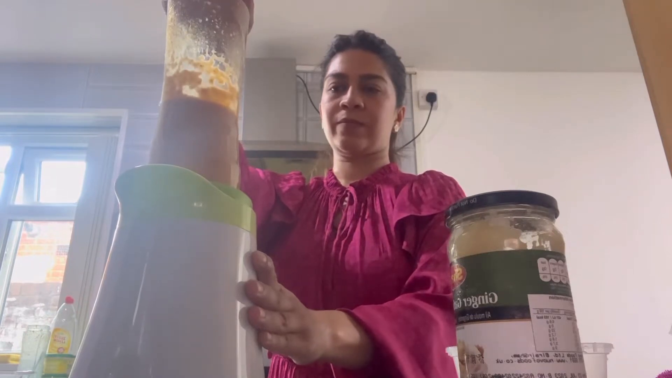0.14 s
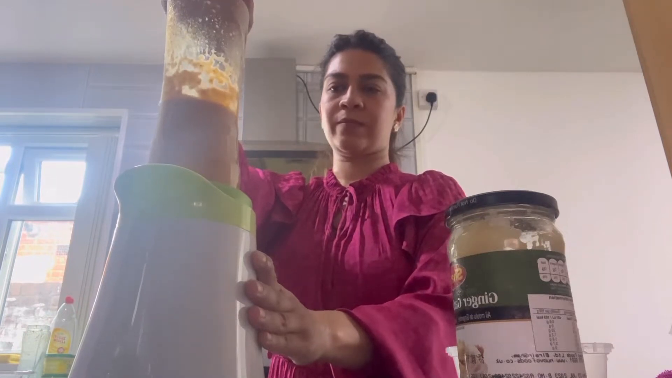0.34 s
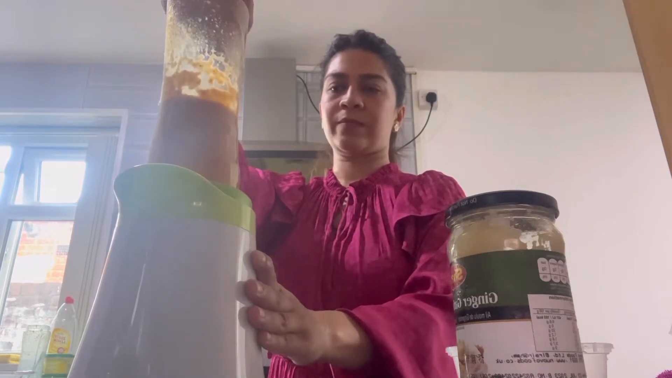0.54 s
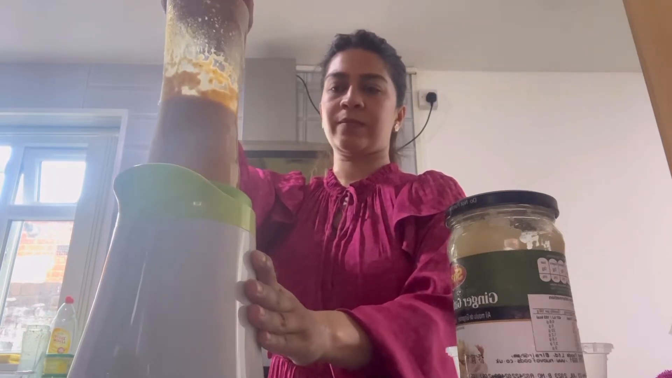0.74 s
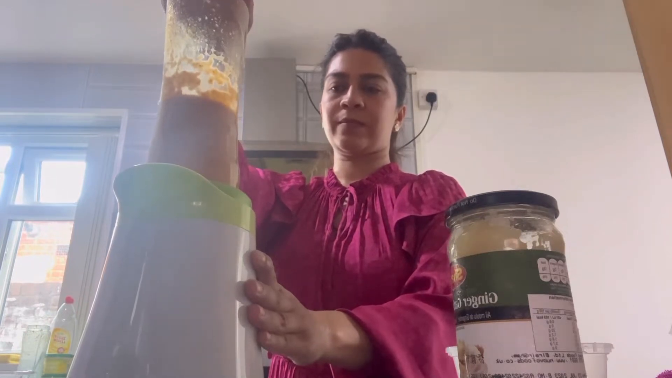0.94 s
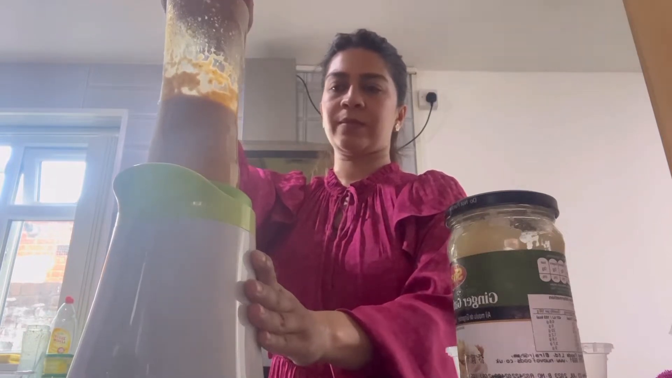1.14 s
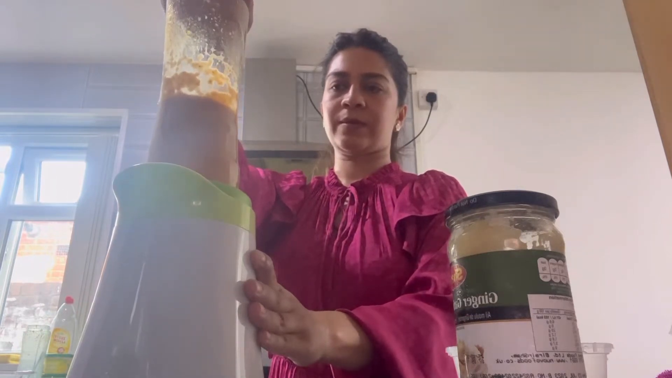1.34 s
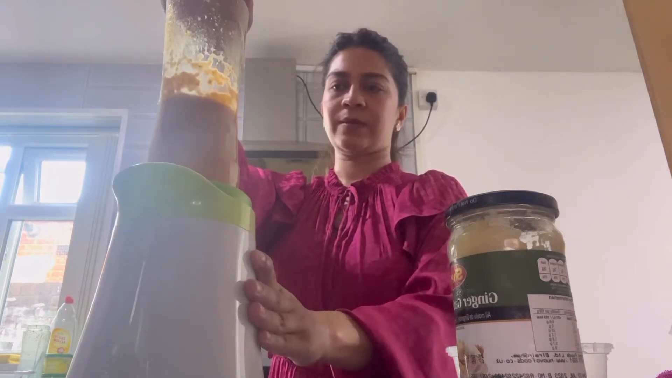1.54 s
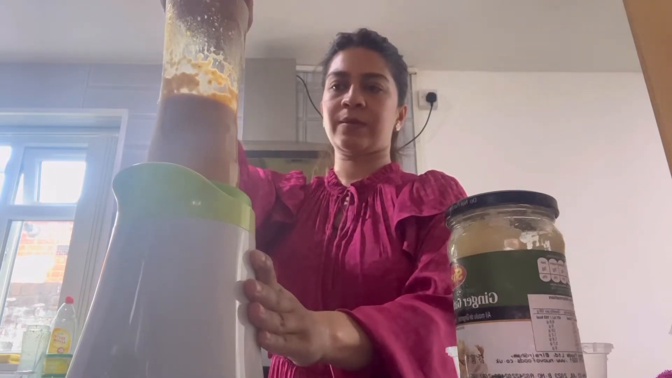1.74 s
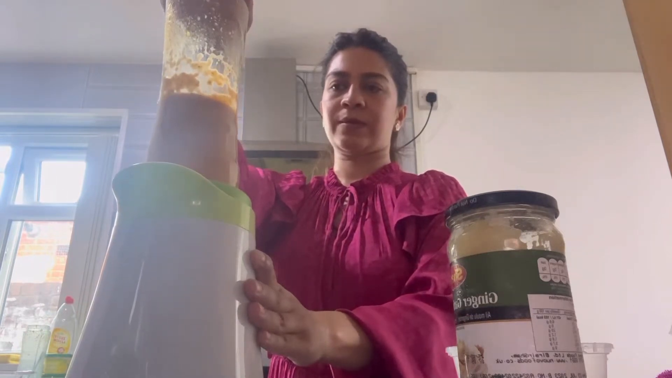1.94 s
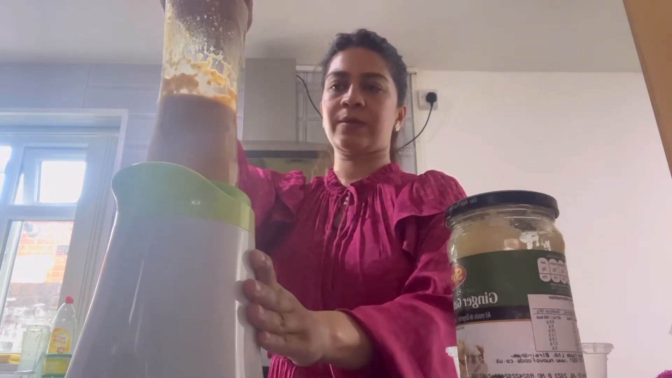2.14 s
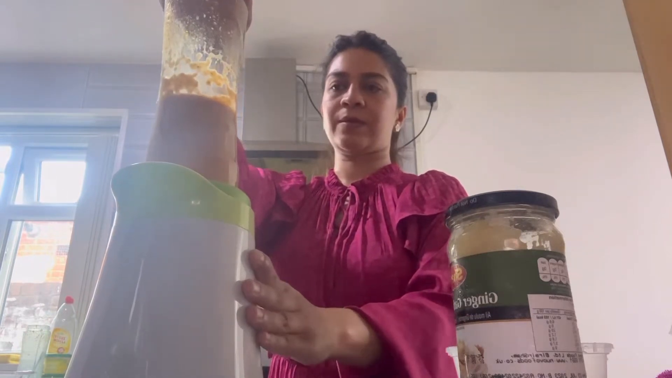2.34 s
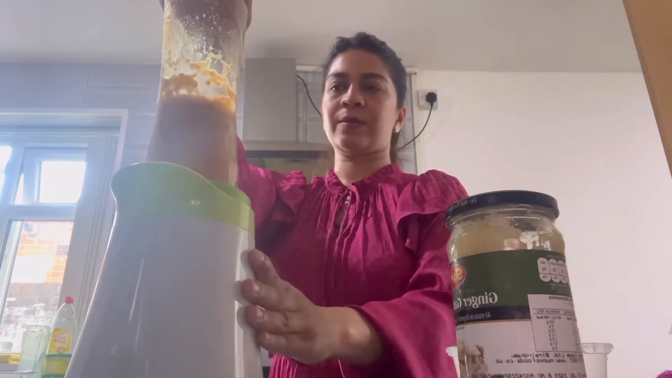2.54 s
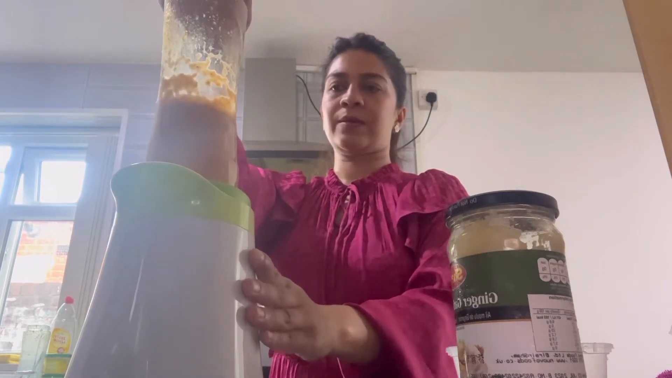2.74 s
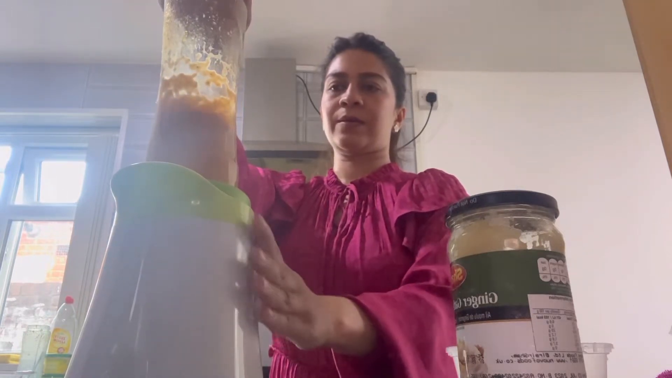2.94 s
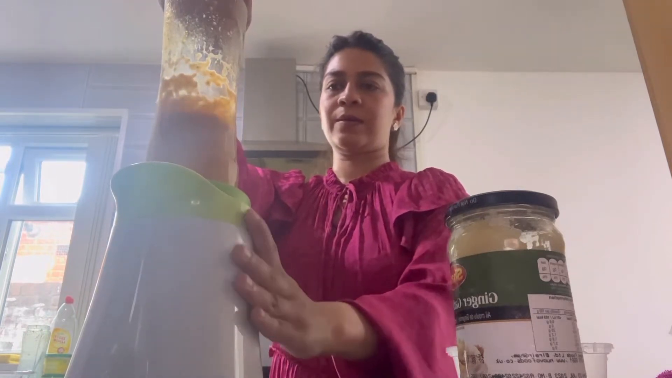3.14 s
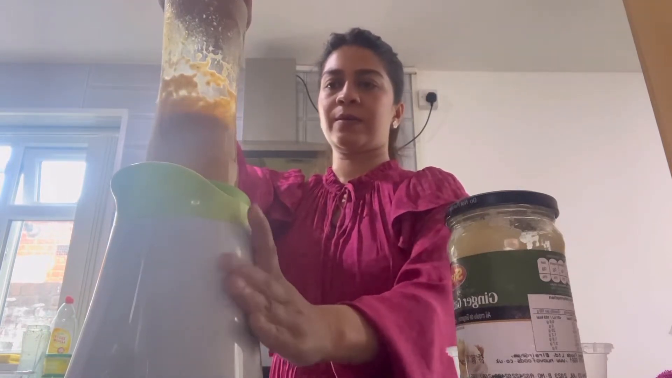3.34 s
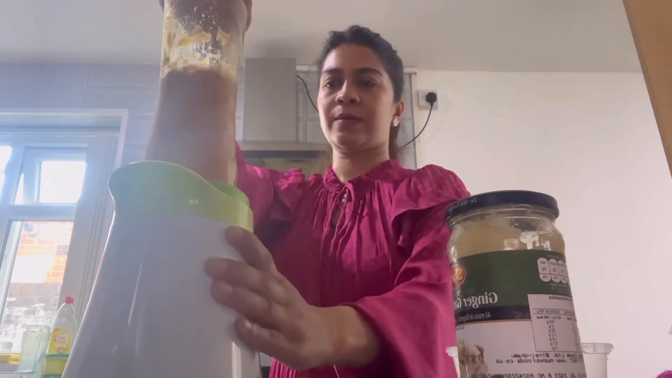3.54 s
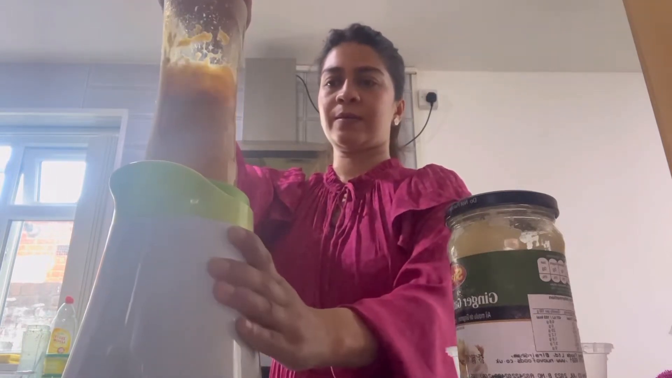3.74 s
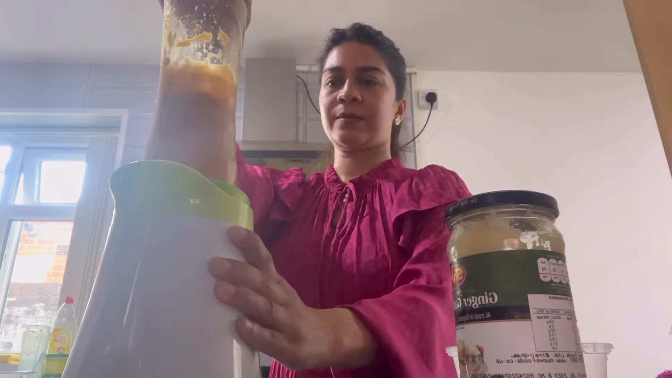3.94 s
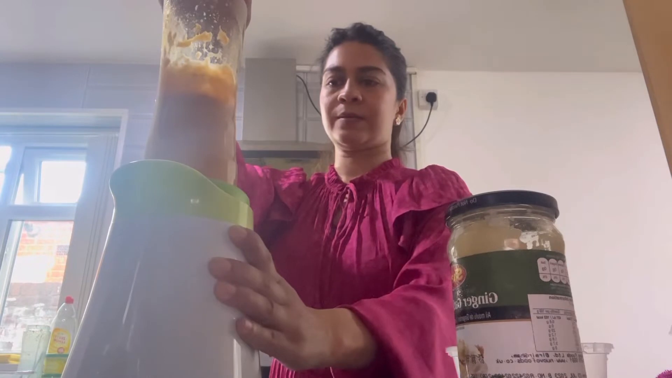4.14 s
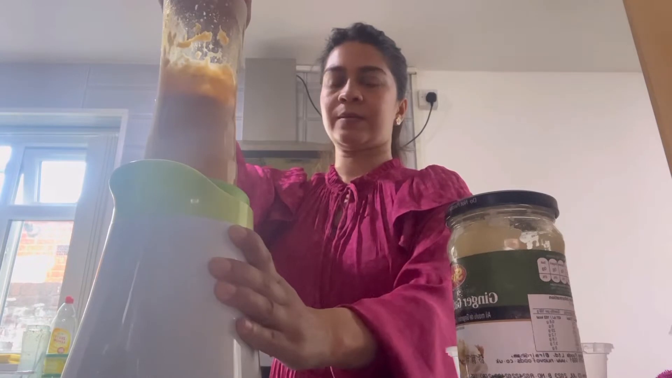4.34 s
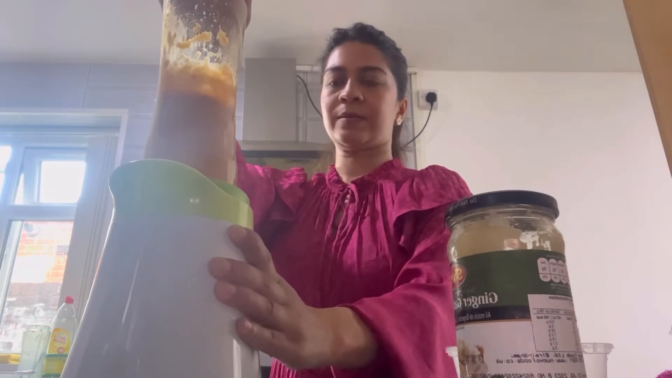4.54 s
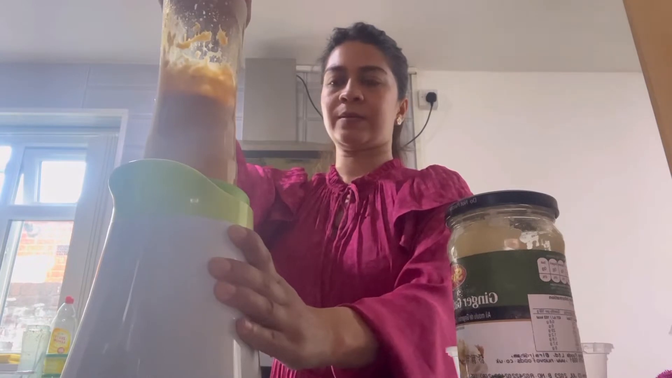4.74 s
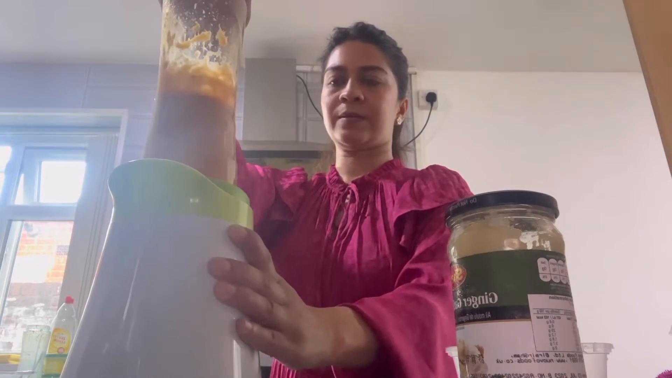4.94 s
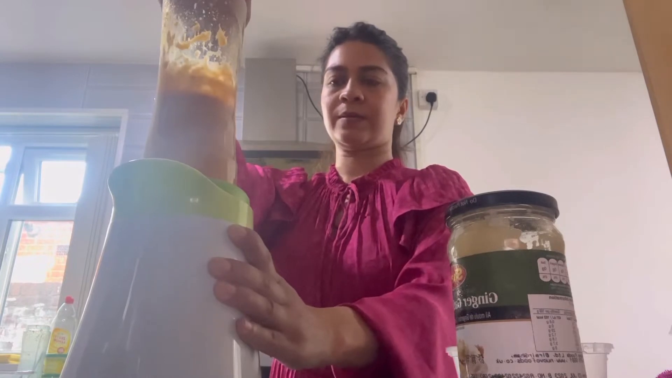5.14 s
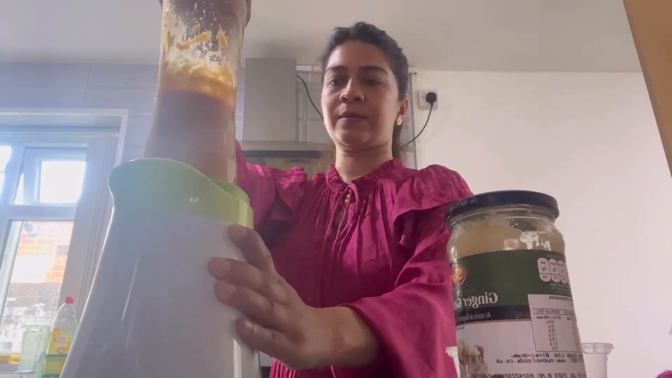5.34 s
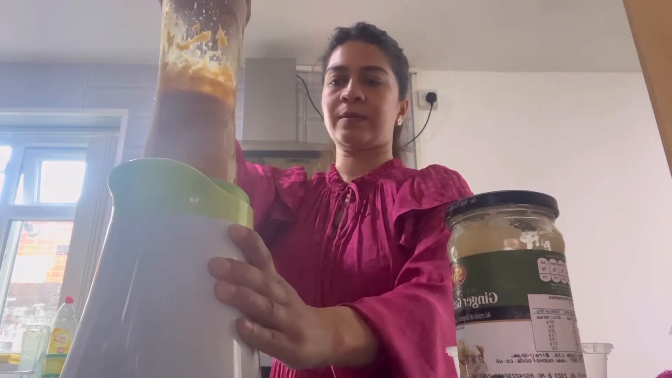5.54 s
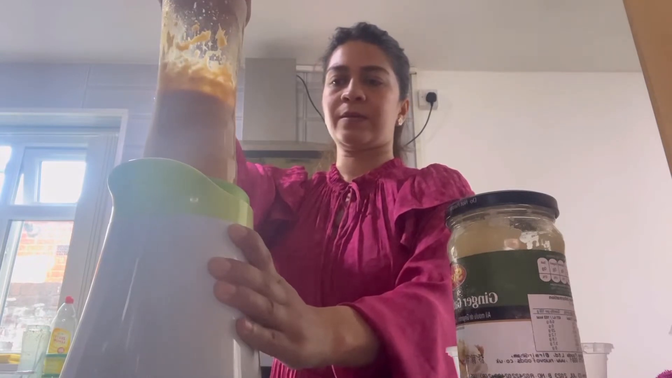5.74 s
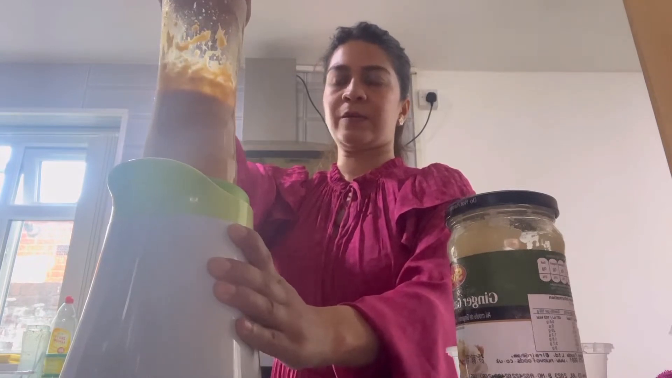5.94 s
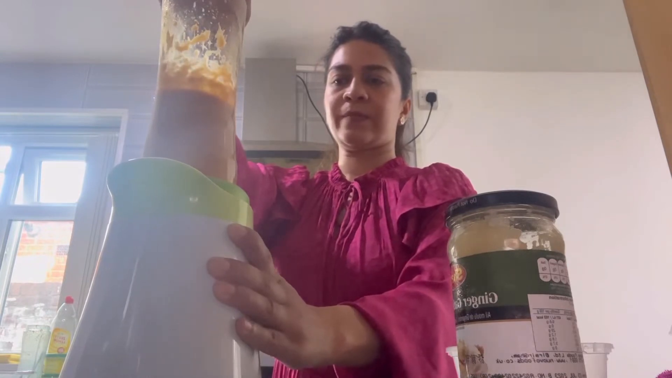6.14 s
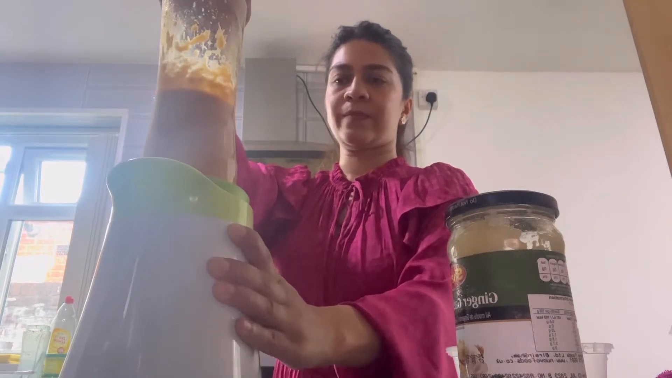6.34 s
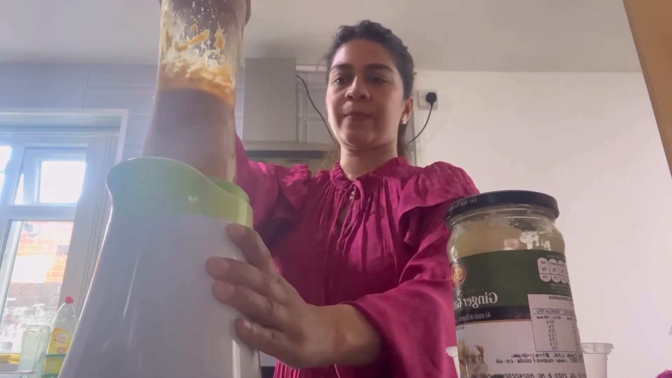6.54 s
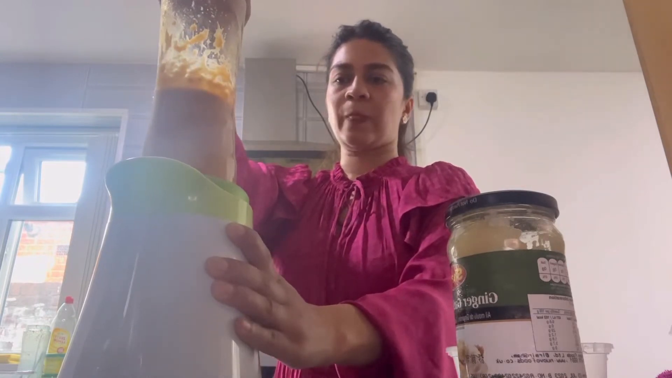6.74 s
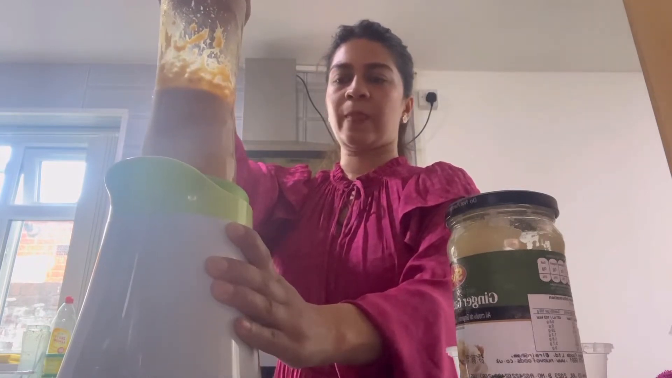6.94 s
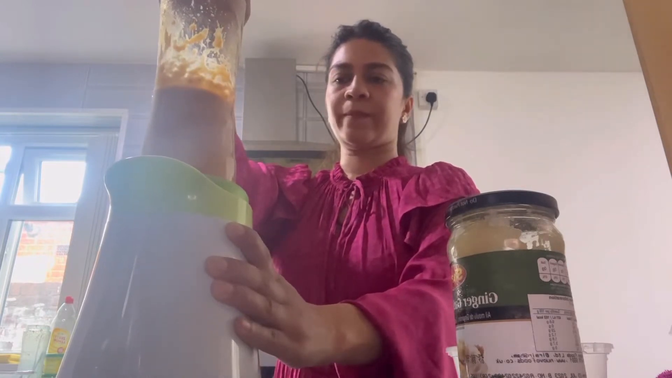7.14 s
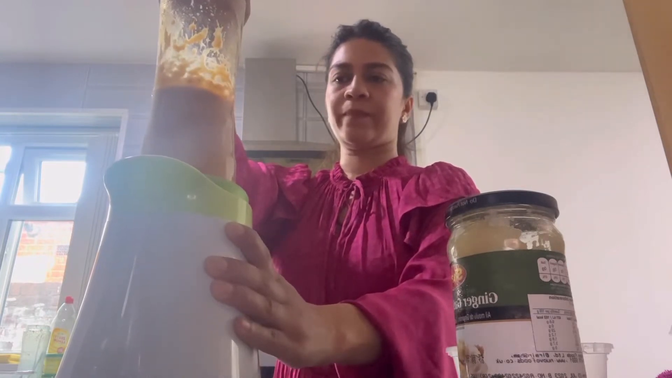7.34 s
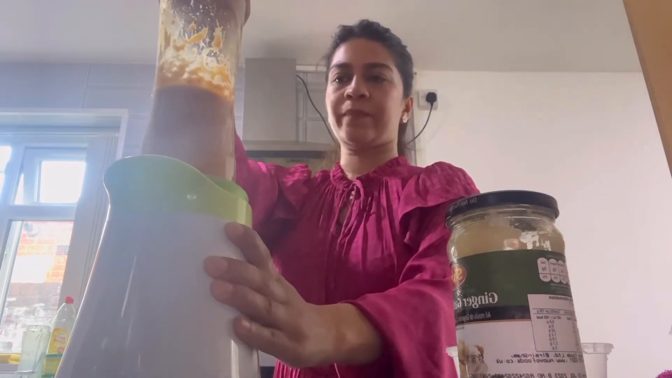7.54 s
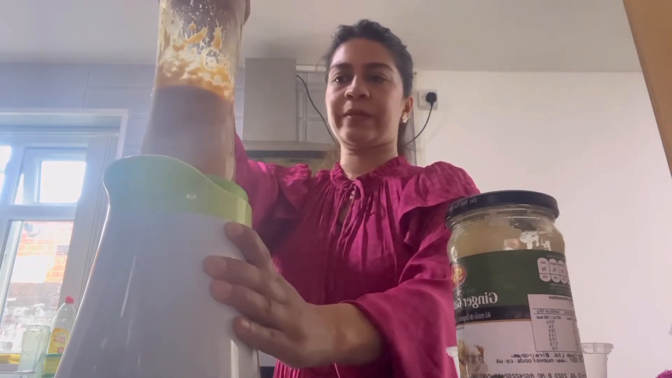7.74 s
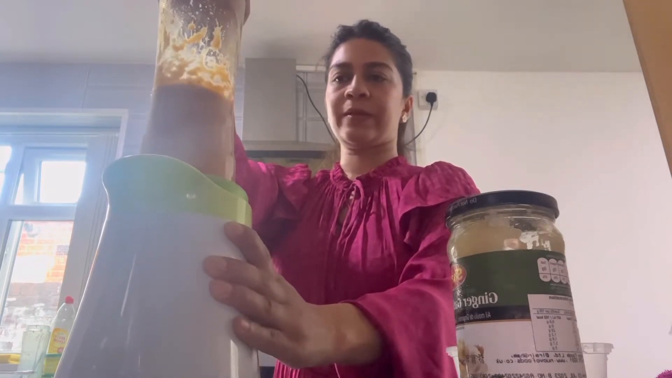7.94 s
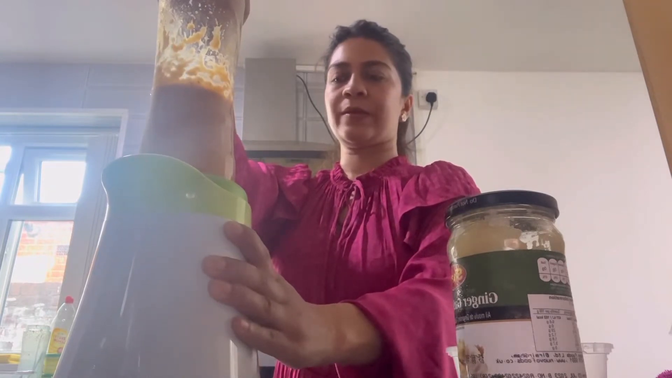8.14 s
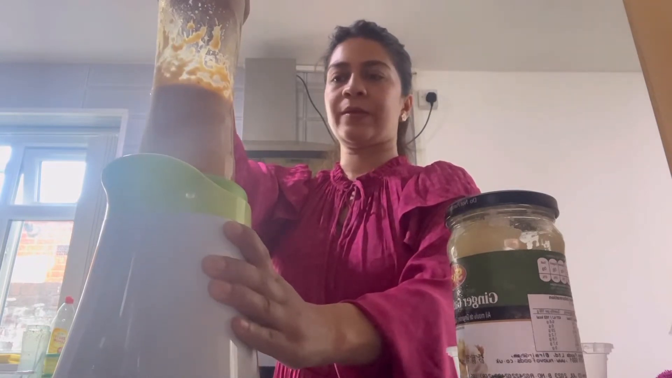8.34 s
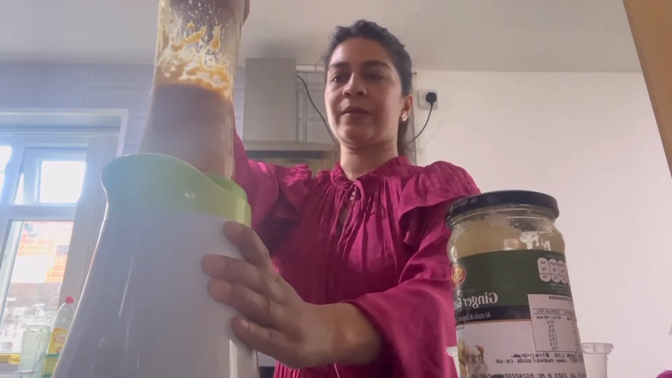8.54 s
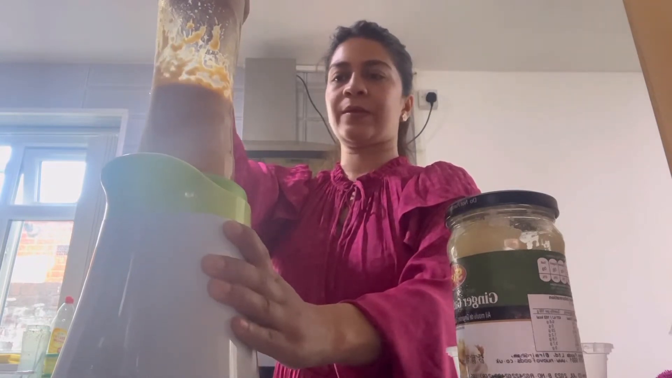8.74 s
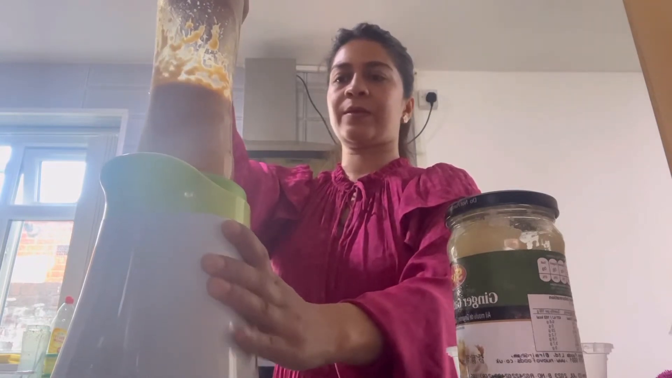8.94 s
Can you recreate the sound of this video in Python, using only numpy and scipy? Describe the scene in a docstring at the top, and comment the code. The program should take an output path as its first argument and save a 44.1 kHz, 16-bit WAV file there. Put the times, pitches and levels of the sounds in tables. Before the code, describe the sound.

Close stereo pickup in a small, quiet kitchen: blades churn and shred dense paste, the plastic jug ringing over a fluttering motor drone. Power is released and the noise sinks quickly in pitch and level, chattering to rest. A hand softly brushes the hollow housing. Then the base clicks and knocks on the counter, the motor surges up within a fraction of a second, and grinding continues almost to the end.

```python
"""A jug blender grinds a thick paste close by in a kitchen, is let go and coasts to a stop, then restarts.
Blades churn and shred the paste as dense grains of noise, which set the plastic jug and housing ringing.
The shaft hums at its harmonics, fluttering with the mains; the coasting paste groans, the coupling rattles.
A hand rubs the housing in the pause, and the restart jolts it on the counter.
Two microphone ports hear it with the room, over a quiet kitchen."""
import sys
import numpy as np
from scipy import signal
from scipy.fft import rfft, irfft, next_fast_len
from scipy.io import wavfile
from scipy.ndimage import uniform_filter1d

SR = 44100
rng = np.random.default_rng(int(sys.argv[2]) if len(sys.argv) > 2 else 0)


def to_wav(s):
    """Save 16-bit WAV."""
    ch = np.atleast_2d(s).T  # columns
    pcm = np.round(np.clip(ch, -1, 1) * 32767)  # PCM
    wavfile.write(sys.argv[1], SR, pcm.astype(np.int16))


N = 396459
TIME = np.arange(N) / SR   # s
SIZE = next_fast_len(N + SR)   # transform length, padded against wrap-around
BINS = np.maximum(np.arange(SIZE // 2 + 1) * SR / SIZE, 1)   # Hz
MAINS_HZ = 50
FULL_SPEED_HZ = 275   # nominal shaft speed; pace is speed as a share of this


def from_db(db):
    """Decibels to gain."""
    return np.exp(np.asarray(db) * (np.log(10) / 20))


def rms_one(x):
    """Scale to rms 1."""
    return x / np.sqrt(np.mean(x ** 2) + 1e-20)


def by_speed(pace, power):
    """Change in dB of a sound whose amplitude grows with a power of speed."""
    return 20 * power * np.log10(pace + 1e-9)


def pan(left_right_db):
    """Left and right gains that differ by so many dB."""
    return from_db(left_right_db * np.array([[.5], [-.5]]))


def at_hz(points):
    """A table read along log frequency."""
    hz, value = np.transpose(points)
    return np.interp(np.log(BINS), np.log(hz), value)


def filtered(x, response):
    """Apply a frequency response."""
    return irfft(rfft(x, SIZE) * response, SIZE)[..., :N]


def drift(rate):
    """Smooth random curve of spread 1 that changes about rate times a second."""
    step = 40   # samples between points
    r = np.exp(-2 * np.pi * rate * step / SR)
    noise = rng.standard_normal(2 * N // step)
    # the first part is dropped so that the curve starts settled
    slow = signal.lfilter([1], [1, -2 * r, r * r], noise)[-(N // step) - 1:]
    return np.interp(np.arange(N) / step, np.arange(len(slow)), rms_one(slow))


def grains(per_s, spread_db):
    """Tiny impacts of uneven size and random sign at random moments."""
    size = from_db(spread_db * np.minimum(rng.exponential(1, N), 4))
    struck = rng.random(N) < per_s / SR
    return rms_one(struck * size * rng.choice([-1, 1], N))


def rubbed(level_db, hz, waver_per_s, flicker_db=2.5, waver=.8):
    """One narrow resonance kept ringing by friction, unsteady in level (dB) and phase (radians)."""
    phase = 2 * np.pi * hz * TIME + waver * drift(waver_per_s)
    level = from_db(level_db + flicker_db * drift(waver_per_s))
    return np.sqrt(2) * level * np.sin(phase)


def ambience(level_db=-47.7, swell_db=.7, hum_db=-57, alike_hz=450):
    """Room noise that swells a little, alike on both sides in the bass, with a faint mains hum."""
    # colour of the quiet kitchen: f/Hz, relative level/dB per Hz
    room_tone = [(30, -44), (62, -12), (95, -9), (130, -12), (160, -8), (190, -13), (230, -2.5), (350, -15),
                 (470, -6.5), (691, -21), (790, -14), (1250, -27), (2400, -33), (3200, -42), (7500, -52),
                 (10500, -49), (14000, -55)]
    colour = from_db(at_hz(room_tone))
    mid = filtered(rng.standard_normal(N), colour)
    side = filtered(rng.standard_normal(N), colour * BINS / np.hypot(BINS, alike_hz))
    noise = (mid + side * np.array([[1], [-1]])) / np.std(mid)
    mains_hum = from_db(hum_db) * np.sin(4 * np.pi * MAINS_HZ * TIME)
    return from_db(level_db + swell_db * drift(4.8)) * noise + mains_hum


def ports():
    """Phase with which the sound reaches the left and right port."""
    # path to the two ports: f/Hz, lead of the left/rad
    port_phase = [(60, 0), (170, 0), (275, 1.5), (335, 2.4), (370, -.6), (520, 1.8), (570, 1.2), (600, -.9),
                  (660, -1.1), (760, 2.2), (820, 2.0), (835, 2.4), (940, 3.0), (1000, .3), (1080, .6),
                  (1380, 4.4), (1500, 3.0), (1790, 3.2), (1850, -.2), (1900, 0), (4500, 1.4), (7500, 2.9),
                  (11000, 1.2)]
    return np.exp(1j * at_hz(port_phase) * np.array([[.5], [-.5]]))


def kitchen(x, t60=0.32, early_t60=0.026, early_db=5, ripple_hz=90):
    """Direct sound at two ports, near reflections from counter and walls, then a short tail."""
    # room sound before the broad colour is evened out: f/Hz, level re the direct sound/dB
    room_share = [(60, -54), (200, 3), (900, -2.5), (2500, 2.5), (5500, 14), (8000, -6), (14000, -9)]
    t = TIME[:SR // 2]
    tail = from_db(-60 * t / t60)
    early = from_db(early_db - 60 * t / early_t60)
    envelope = (tail + early) * (t > .002)
    echoes = rng.standard_normal((2, len(t))) * envelope / np.sqrt(np.sum(envelope ** 2))
    response = ports() + from_db(at_hz(room_share)) * rfft(echoes, SIZE)
    # the room ripples the spectrum finely but adds no broad colour
    broad = uniform_filter1d(np.abs(response) ** 2, size=ripple_hz * SIZE // SR, axis=1)
    return filtered(x, response / np.sqrt(broad))


def hand():
    """A palm slides over the housing in short pushes; its tiny slips excite the hollow plastic."""
    # pushes of the palm: t/s, length/s, level/dB
    rubs = [(2.875, .02, -50), (2.955, .025, -49), (3.06, .018, -47), (3.115, .02, -50)]
    # hollow housing under the palm: f/Hz, width before squaring/Hz, level/dB
    hollow = [(385, 70, -5), (472, 80, 0), (760, 60, -9)]
    push = sum(from_db(level_db) * np.exp(-((TIME - s) / length_s) ** 2) for s, length_s, level_db in rubs)
    response = 0
    for hz, width_hz, level_db in hollow:
        response = response + from_db(level_db) / (1 + 2j * (BINS - hz) / width_hz) ** 2
    return push * rms_one(filtered(grains(900, spread_db=2.5), response))


def jolts(crack_db=-2, crack_t60=.012):
    """The switch clicks, the coupling takes up the load and the housing kicks against the counter."""
    # blows of switching on: t/s, level/dB, contact softness f/Hz (low is soft)
    blows = [(3.352, -37, 12000), (3.378, -26, 1200), (3.396, -26, 500), (3.425, -16, 450),
             (3.438, -16, 180), (3.46, -11, 55)]
    # modes of the housing on the counter: f/Hz, level/dB, t60/s
    modes = [(54, -7, .13), (72, -0.5, 0.12), (111, -8, 0.1), (165, -1, .12), (225, -8, .08),
             (445, 4, 0.075), (560, -5, .07), (660, 0, 0.11), (910, -5, .08), (2500, -16, .03),
             (5600, 1, .012), (10000, -9, .005)]
    out = np.zeros(N)
    t = TIME[:SR // 2]
    for s, level_db, soft_hz in blows:
        # the harder the contact, the louder its crack
        crack = from_db(crack_db - 60 * t / crack_t60) * rng.standard_normal(len(t))
        blow = crack * 2 * soft_hz / SR
        for hz, mode_db, t60 in modes:
            # a contact feeds the modes near its own speed
            strength = from_db(mode_db) / np.hypot(1, hz / soft_hz) * (hz / np.hypot(hz, soft_hz / 2)) ** 2
            ring = from_db(-60 * t / t60) * np.sin(2 * np.pi * hz * t)
            blow = blow + rng.choice([-1, 1]) * strength * ring
        # a soft contact builds slowly
        onset = 1 - np.exp(-2 * soft_hz * t)
        start = int(s * SR)
        out[start:start + len(t)] += from_db(level_db) * blow * onset
    return out


def motor(speed_jitter=.0007):
    """Drive lifts the shaft to its loaded speed; drag stops it. Gives speed Hz, drive 0-1, strain 0-1."""
    # runs under power: switched on t/s, let go t/s
    runs = [(-1.0, 2.2), (3.349, 8.925)]
    # speed that the paste allows the shaft under power: t/s, f/Hz
    loaded_speed = [(0.0, 271), (.28, 272.6), (.46, 270.9), (.85, 272.4), (1.0, 268.4), (1.26, 274.5),
                    (1.54, 273.4), (1.64, 271.5), (1.94, 271.9), (2.08, 275.4), (3.6, 269), (3.76, 272),
                    (3.88, 265), (3.97, 272.6), (4.22, 270.2), (4.5, 273.2), (4.62, 272.5), (4.82, 276),
                    (5.05, 273.7), (5.18, 274.2), (5.32, 271.9), (5.42, 273.8), (5.62, 274), (5.78, 280.3),
                    (6.1, 276.4), (6.28, 275.9), (6.38, 273.1), (6.52, 275.4), (6.86, 274.3), (7.04, 278.8),
                    (7.16, 278.4), (7.3, 274), (7.48, 277), (7.72, 275.8), (7.85, 274.2), (8.0, 277.2),
                    (8.24, 277), (8.46, 280.3), (8.6, 276.2), (8.74, 277.3), (8.92, 275.6)]
    run_up_s, torque_s = .092, .03   # time constants of gathering speed and of the drive
    coast_s, drag_s = .68, .87   # time to come to rest; time constant of the paste's drag
    strain_hz, strain_width_hz = 271.9, 1.4   # strain grows as the paste pulls the speed under this
    loaded_hz = np.interp(TIME, *np.transpose(loaded_speed))
    share, drive = 0, 0
    rest = np.exp(-coast_s / drag_s)
    for on_s, off_s in runs:
        since_on, since_off = np.maximum(TIME - on_s, 0), np.maximum(TIME - off_s, 0)
        coasting = np.maximum(np.exp(-since_off / drag_s) - rest, 0) / (1 - rest)
        share = share + (1 - np.exp(-since_on / run_up_s)) * coasting
        drive = drive + (1 - np.exp(-since_on / torque_s)) * np.exp(-since_off / torque_s)
    strain = .5 + .5 * np.tanh((strain_hz - loaded_hz) / strain_width_hz)
    speed_hz = share * loaded_hz * (1 + speed_jitter * drift(11.68))
    return speed_hz, drive, strain


def base(pace, strain, rumble_db=-48, buzz_db=-49.3, buzz_waver=0.18, strain_db=2.5):
    """The base shakes the counter, and the iron buzzes at twice the mains rate; both grow under strain."""
    # colour of the base shaking on the counter: f/Hz, relative level/dB per Hz
    shake_colour = [(35, -54), (50, -13), (70, 7), (88, -15), (130, 4.5), (185, -15), (240, -1), (400, -15),
                    (1000, -50)]
    rumble = rms_one(filtered(rng.standard_normal(N), from_db(at_hz(shake_colour))))
    rumble = from_db(rumble_db) * rumble * (pace + 1e-9) ** 0.27
    buzz = np.sqrt(2) * np.sin(4 * np.pi * MAINS_HZ * TIME) * (1 + buzz_waver * drift(2.7))
    buzz = from_db(buzz_db) * buzz * pace ** 2
    return from_db(strain_db * strain) * (rumble + buzz)


def rattle(pace, drive, level_db=-41.5, ends_at_pace=.14, soft_hz=4000):
    """With the power off the slack coupling chatters, until the shaft is almost still."""
    # ringing of the slack coupling: f/Hz, width/Hz, level/dB
    rings = [(1880, 90, -2), (2400, 80, -3), (3120, 70, -4.5)]
    response = 0
    for hz, width_hz, ring_db in rings:
        response = response + from_db(ring_db) / (1 + 2j * (BINS - hz) / width_hz)
    # little bass below the first ring; a soft contact dulls the top
    response = response * BINS ** 2 / (BINS ** 2 + rings[0][0] ** 2) / (1 + (BINS / soft_hz) ** 4)
    loose = (1 - drive) * (.5 + .5 * np.tanh((pace - ends_at_pace) / .07))
    chatter = rms_one(filtered(grains(500, spread_db=2.0), response))
    return from_db(level_db + by_speed(pace, .8)) * loose * chatter


def housing_drone(pace, level_db=-45.5):
    """The housing drones near full speed, mostly on the left."""
    return pan(15) * rubbed(level_db + by_speed(pace, 5), hz=342, waver_per_s=9)


def paste_groan(pace, drive, level_db=-36.5):
    """The paste groans while the blades coast."""
    return (1 - drive) * rubbed(level_db + by_speed(pace, .75), hz=408, waver_per_s=16)


def jug_singing(pace, strain, level_db=-39, strain_db=10):
    """The jug sings when the paste presses on its wall, louder under strain."""
    return rubbed(level_db + strain_db * strain + by_speed(pace, 2), hz=742, waver_per_s=5)


def hum(angle, speed_hz, drive, gain_db=1.0, flicker_db=1.6, wobble=0.1, mains_depth=0.15):
    """Shaft harmonics slide through peaks, shaken by the paste; torque pulses twice per mains cycle."""
    # tones at full speed: shaft multiple, sideband number (of twice the mains),
    # level before peaks and gain/dB, left-right/dB
    harmonics = [(1, 0, -44.6, 2), (1, 1, -51.5, 5), (2, 0, -44, 5), (3, 0, -38, 2), (4, 0, -43.5, -1.5),
                 (4, -1, -49.5, 19), (5, 0, -48.5, -3), (5, 1, -51, -10), (6, 0, -45.5, -3),
                 (7, 0, -51, -2), (8, 0, -58, -12), (9, 0, -49.5, -2), (10, 0, -58, 0), (11, 0, -52.5, 1),
                 (12, 0, -59, -2), (15, 0, -54.5, 15.5)]
    # peaks and dips between motor and ports: f/Hz, width/Hz, lift/dB
    tone_peaks = [(276, 26, 9), (370, 90, 7), (820, 60, 11.5), (828, 5, -10), (1090, 76, 10.6),
                  (1101, 5, -3), (1376, 34, 11), (1645, 80, 10), (1905, 42, 12.5)]
    whine_drop_db, whine_above_hz = 9, 550   # with the power off the whine sinks into the grinding
    blades, blade_start_db, run_up_done = 4, 6, .99   # blade note lift at standstill; pace where it ends
    mains = 4 * np.pi * MAINS_HZ * TIME
    peaks_db = sum(lift_db / (1 + (2 * (BINS - hz) / width_hz) ** 2) for hz, width_hz, lift_db in tone_peaks)
    pace = speed_hz / FULL_SPEED_HZ
    starting = drive * np.sqrt(np.maximum(1 - pace / run_up_done, 0))
    out = np.zeros((2, N))
    for k, sideband, level_db, pan_db in harmonics:
        line_hz = k * speed_hz + sideband * 2 * MAINS_HZ
        # higher harmonics are the more restless
        unrest = np.sqrt(k / 4)
        line_db = level_db + by_speed(pace, 1.4) + np.interp(line_hz, BINS, peaks_db)
        line_db = line_db + flicker_db * unrest * drift(11)
        line_db = line_db - whine_drop_db * (1 - drive) / (1 + (whine_above_hz / np.maximum(line_hz, 1)) ** 4)
        start_phase = rng.uniform(0, 2 * np.pi)
        line = np.sin(k * angle + sideband * mains + start_phase + wobble * unrest * drift(37))
        if sideband:
            line = line * drive
        elif k == blades:
            line_db = line_db + blade_start_db * starting
        out += pan(pan_db) * (np.sqrt(2) * from_db(line_db) * line)
    return from_db(gain_db) * out * (1 + mains_depth * drive * np.sin(mains))


def blade_work(pace, drive, strain):
    """Churning and shredding in dB: they follow speed, with brief swells; slumping paste cuts the churn."""
    # brief swells of the grinding (lumps caught under power, small knocks while coasting):
    # t/s, length/s, churning lift/dB, shredding lift/dB
    swells = [(.6, .08, 1.0, 1.0), (2.44, .014, 3, 4), (2.52, .05, 1, 3.5), (2.58, .018, 3.5, 2.5),
              (2.74, .025, 5, 0), (3.77, .04, 2.5, 1.5), (3.85, .03, 3.5, 2.0), (4.22, .08, 2.0, .8),
              (8.56, .06, 1.5, .8)]
    slump_pace, slump_db = .29, 5   # under this pace the paste stops circulating
    starting = drive * np.maximum(1 - pace, 0)   # the blades tear the paste loose
    slumped = (1 - drive) * (.5 + .5 * np.tanh((slump_pace - pace) / .07))
    # both levels are those before the jug's resonances
    churn_db = -27.7 + by_speed(pace, .74) + 1.0 * strain + 8.5 * starting - slump_db * slumped
    shred_db = -34.9 + by_speed(pace, 1.38) + 3.6 * drive + 4.5 * starting
    for s, length_s, churn_lift_db, shred_lift_db in swells:
        swell = np.exp(-((TIME - s) / length_s) ** 2)
        churn_db = churn_db + churn_lift_db * swell
        shred_db = shred_db + shred_lift_db * swell
    return churn_db, shred_db


def body(x, wander=.003, swell=.16, patchy_db=1.2, slosh_per_s=3, patches_above_hz=1000, size=2048):
    """Jug and housing resonances wander and swell as the paste sloshes; brief patches of wall ring out."""
    # resonances of jug and housing: f/Hz, width/Hz, mean lift/dB, left-right/dB
    resonances = [(343, 20, -1, 16), (411, 31, 2, 3), (595, 40, -3, 6), (656, 41, 2, -2), (770, 50, 3.5, 1),
                  (895, 50, 5, 5), (960, 90, -1, 11), (1050, 45, -4, 3), (1290, 60, 3, -3),
                  (1480, 80, 4.5, -3), (1556, 70, 2.5, 1), (1750, 115, 6.5, -1), (1873, 57, 0, -6),
                  (2020, 70, -4, -1), (2525, 80, 6.5, -8), (2790, 150, -9, 2), (3100, 130, 5, 0),
                  (3310, 80, 2, 0), (4130, 260, 4.2, 11), (4330, 90, -4, 5), (5150, 160, 2, -3),
                  (5620, 150, 3.5, 11), (6560, 450, 3.5, 7)]
    overlap = size - size // 4
    hz_axis, frame_s, spectra = signal.stft(x, SR, nperseg=size, noverlap=overlap)

    def slosh():
        return np.interp(frame_s, TIME, drift(slosh_per_s))

    # noise smoothed twice over frequency and time
    patches = rng.standard_normal(spectra.shape[1:])
    for axis in (0, 1, 0, 1):
        patches = uniform_filter1d(patches, size=5, axis=axis)
    level_db = patchy_db * rms_one(patches) * (hz_axis / np.hypot(hz_axis, patches_above_hz))[:, None]
    sides = np.array([[[.5]], [[-.5]]])
    for hz, width_hz, lift_db, pan_db in resonances:
        centre_hz = hz * (1 + wander * slosh())
        shape = 1 / (1 + (2 * (hz_axis[:, None] - centre_hz) / width_hz) ** 2)
        level_db = level_db + shape * (lift_db * (1 + swell * slosh()) + sides * pan_db)
    return signal.istft(spectra * from_db(level_db), SR, nperseg=size, noverlap=overlap)[1][:, :N]


def paste(angle, pace, churn_db, shred_db, blade_depth=0.26, uneven_db=0.88, count=3):
    """Blades slap paste and cut fibres, surging each half turn; each jug side sounds into the room alone."""
    # smooth colour of the churning paste: f/Hz, relative level/dB per Hz
    churn_points = [(60, -55), (190, -27), (260, -17.5), (400, -3), (520, -4.5), (720, -1.8), (930, 0),
                    (1200, -9.5), (1500, -7.3), (2100, -9.5), (2800, -18), (5000, -33.5), (14000, -56)]
    # smooth colour of the shredding: f/Hz, relative level/dB per Hz
    shred_points = [(900, -4), (2000, 2), (2850, 1), (3300, -2), (4600, -0.5), (6500, -5), (7600, -11.5),
                    (10500, -10), (12500, -16.5), (14000, -16)]
    churn_colour, shred_colour = from_db(at_hz(churn_points)), from_db(at_hz(shred_points))
    stroke = (1 + blade_depth * np.sin(2 * angle)) * from_db(uneven_db * drift(25))
    busy = np.maximum(pace, .7)
    turning = np.clip(pace * 10, 0, 1)   # silent at rest
    out = 0
    for side in range(count):
        churn = rms_one(filtered(grains(3000 * busy, spread_db=3.0) * stroke, churn_colour))
        shred = rms_one(filtered(grains(4000 * busy, spread_db=3.2) * stroke, shred_colour))
        grinding = from_db(churn_db) * churn + from_db(shred_db) * shred
        out = out + kitchen(turning * grinding)
    return body(out) / np.sqrt(count)


def scene(hum_room_db=-16):
    """One shaft drives the tones, the grinding and the shaking."""
    speed_hz, drive, strain = motor()
    pace = speed_hz / FULL_SPEED_HZ
    angle = 2 * np.pi * np.cumsum(speed_hz) / SR
    tones = hum(angle, speed_hz, drive) + jug_singing(pace, strain)
    tones = tones + paste_groan(pace, drive) + housing_drone(pace)
    # the tones arrive mostly direct, the knocks and shaking with the full room
    room_part = from_db(hum_room_db)
    direct = filtered((1 - room_part) * tones, ports())
    shaken = base(pace, strain) + jolts() + rattle(pace, drive) + hand()
    in_room = kitchen(room_part * tones + shaken)
    grinding = paste(angle, pace, *blade_work(pace, drive, strain))
    return direct + in_room + grinding + ambience()


def record(dry, low_cut_hz=40, top_cut_hz=13900):
    """The microphone loses the deepest bass, and the top is cut steeply."""
    bass_cut = signal.butter(6, low_cut_hz, "high", fs=SR, output="sos")
    top_cut = signal.ellip(10, .2, 80, top_cut_hz, fs=SR, output="sos")
    return signal.sosfilt(top_cut, signal.sosfilt(bass_cut, dry))


dry = scene()
out = record(dry)
to_wav(out)
```